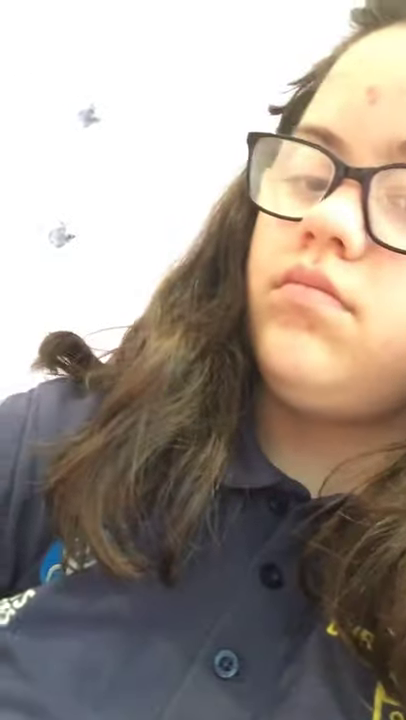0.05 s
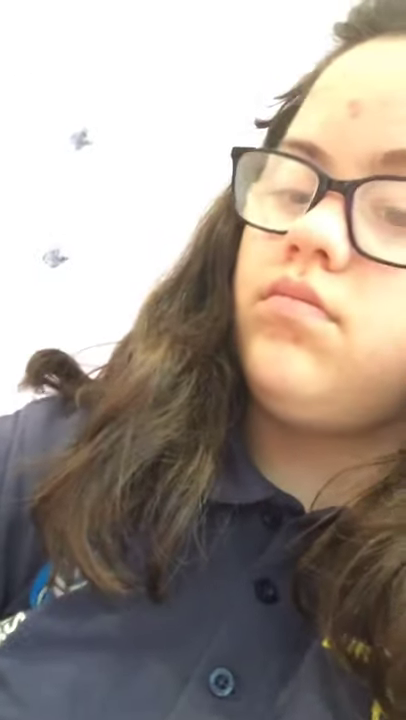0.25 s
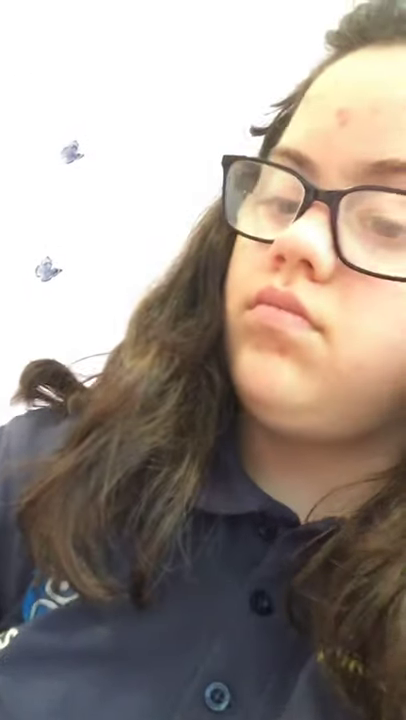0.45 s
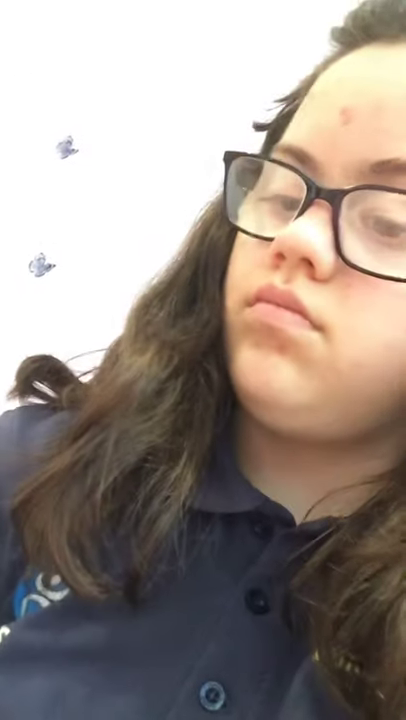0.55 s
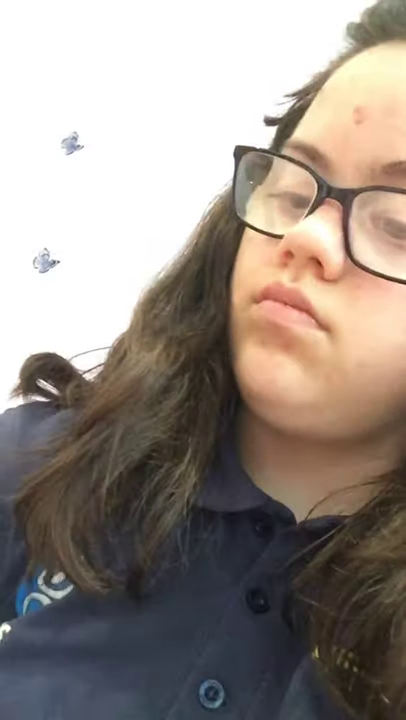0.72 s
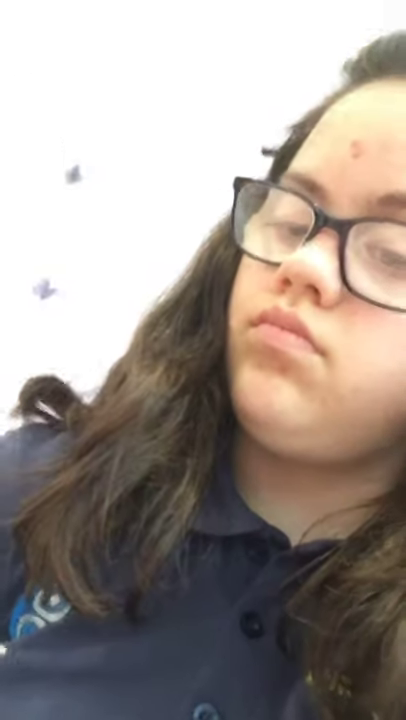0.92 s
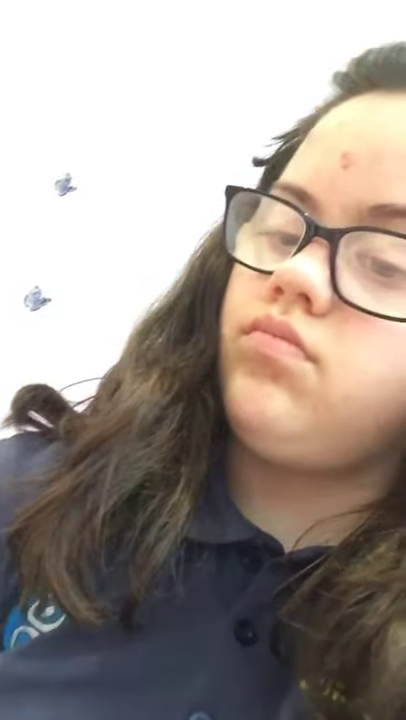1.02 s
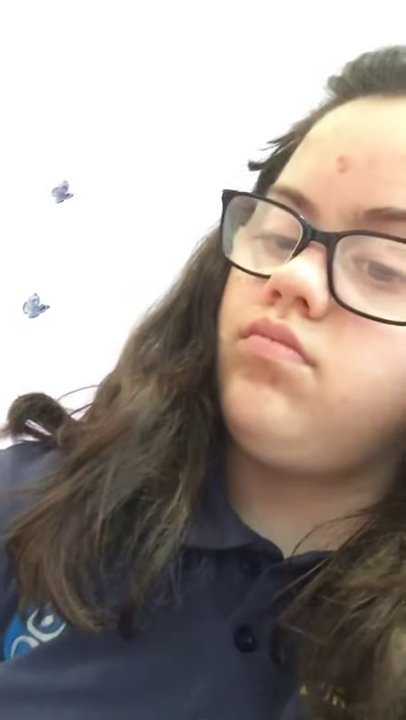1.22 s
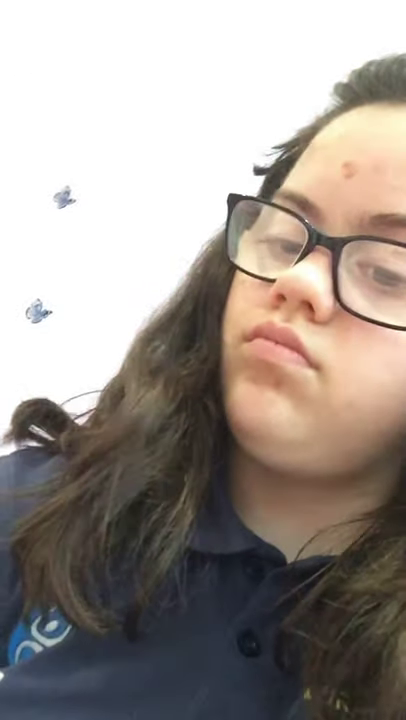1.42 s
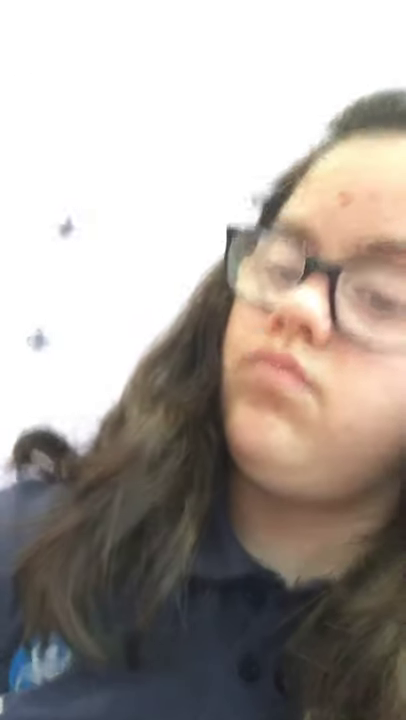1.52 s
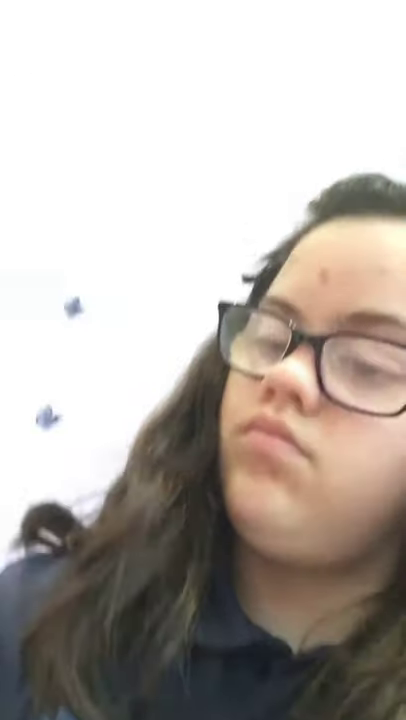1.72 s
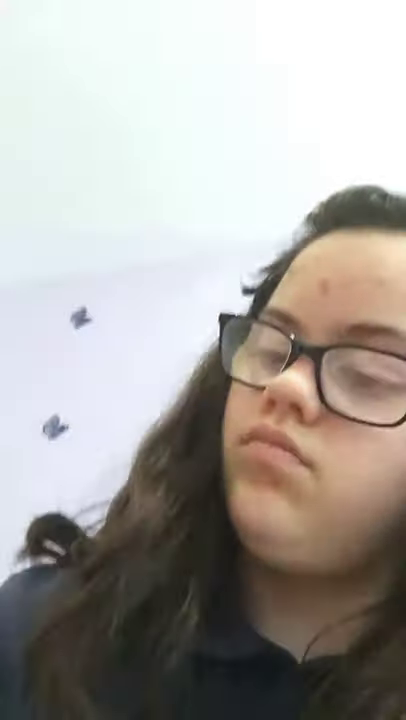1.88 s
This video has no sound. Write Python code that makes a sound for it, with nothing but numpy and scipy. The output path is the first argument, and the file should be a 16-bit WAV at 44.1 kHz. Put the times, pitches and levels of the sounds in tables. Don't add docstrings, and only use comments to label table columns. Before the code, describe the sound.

Plastic pens clatter in a soft case, close to a phone in a small room. Soft rustle and light ticks lead to the loudest sharp crack at 0.22 s, with a fading metallic buzz. Near quiet follows until knocks at 0.83-0.87, a hard cluster at 0.99-1.02 and more to 1.15. Light ticks run 1.27-1.58, a firmer knock lands at 1.68, then it fades over faint, gated low drone.

```python
import sys
import numpy as np
from scipy import signal
from scipy.fft import rfft, irfft
from scipy.io import wavfile
from scipy.ndimage import uniform_filter1d

SR = 44100
rng = np.random.default_rng(int(sys.argv[2]) if len(sys.argv) > 2 else 0)


def transcribe(signal):
    frames = np.atleast_2d(signal).T
    limited = np.clip(frames, -1, 1)
    pcm = np.round(limited * 32767).astype(np.int16)
    wavfile.write(sys.argv[1], SR, pcm)


def volts_from_decibels(level):
    exponent = np.asarray(level, float) / 20
    return 10 ** exponent


N = 85995
T = np.arange(N) / SR

SPLIT_HZ = 7800
CRACK_T60_S = 0.0055
THUMP_HZ, THUMP_T60_S = 344.1, 0.03


def unit(x):
    return x / np.sqrt(np.mean(x ** 2))


def peak_one(x):
    return x / np.abs(x).max()


def band(x, lo_hz, hi_hz):
    return signal.sosfilt(signal.butter(2, [lo_hz, min(hi_hz, 0.49 * SR)], "band", fs=SR, output="sos"), x)


def noise_band(lo_hz, hi_hz):
    return unit(band(rng.standard_normal(N), lo_hz, hi_hz))


def lowpass(x, order, hz):
    return signal.sosfilt(signal.butter(order, hz, fs=SR, output="sos"), x)


def coloured(points):
    hz, db = np.array(points).T
    f = np.arange(N // 2 + 1) * SR / N + 1
    curve_db = np.interp(np.log(f), np.log(hz), db, left=-80, right=-80)
    return unit(irfft(rfft(rng.standard_normal(N)) * volts_from_decibels(curve_db), N))


def walk(rate):
    k = int(SR / rate)
    steps = np.repeat(rng.standard_normal(N // k + 1), k)
    return unit(uniform_filter1d(uniform_filter1d(steps, k), k)[:N])


def ring(t, hz, t60):
    return np.sin(2 * np.pi * hz * t) * 1000. ** (-t / t60)


def add(out, s, x):
    i = int(s * SR)
    out[i:i + len(x)] += x[:max(N - i, 0)]


# f/Hz, width/Hz, level/dB
DRONE_BANDS = [(172.8, 12.2, -2), (225.7, 36, -3), (302.3, 20, -4), (123, 58, -12), (216, 130, -3.5)]
# f/Hz, level/dB per Hz
AIR_COLOUR = [(190, -36.5), (330, -2.5), (372, -5.5), (730, 0), (912, -4), (1020, 2.5), (1150, -8),
              (2110, -37), (2200, -42.5), (2860, -69), (4840, -120)]
# t/s, drone level/dB, favoured f/Hz, air level/dB
GATE_OPENING = [(0.0, -46, 260, -64.5), (.09, -50, 220, -64.5), (0.16, -58, 240, -64.5),
                (.32, -60, 190, -67), (0.504, -60.5, 170, -69.5), (0.7, -59.5, 170, -74),
                (0.764, -63.5, 220, -67.5), (0.912, -57.5, 240, -64.5), (1.0, -51, 215, -68.5),
                (1.14, -60, 170, -69), (1.222, -67, 200, -69.5), (1.42, -66, 230, -71),
                (1.558, -62, 300, -73), (1.682, -57, 230, -66.5), (1.84, -62, 185, -77.5),
                (1.95, -75.5, 230, -98)]


def background():
    s, drone_db, favoured_hz, air_db = np.array(GATE_OPENING).T
    favoured = np.interp(T, s, favoured_hz)
    drone = np.zeros(N)
    for hz, width, db in DRONE_BANDS:
        off_pitch_db = 20 * np.abs(np.log2(hz / favoured))
        drone += volts_from_decibels(db + 2.0 * walk(7.6) - off_pitch_db) * noise_band(hz - width / 2, hz + width / 2)
    drone = unit(drone) * volts_from_decibels(np.interp(T, s, drone_db))
    air = coloured(AIR_COLOUR) * volts_from_decibels(0.99 * walk(28)) * volts_from_decibels(np.interp(T, s, air_db))
    hiss = volts_from_decibels(-93.5) * rng.standard_normal(N)
    return drone + air + hiss


# f/Hz, level/dB per Hz
CLOTH_COLOUR = [(130, 3), (1700, 8.5), (2300, -0.5), (3100, 4), (5000, 0.5), (6600, 3), (10000, -3.5),
                (14800, -6), (17000, -5)]
# start t/s, length t/s, level/dB, low edge f/Hz, high edge f/Hz
CLOTH_SLIDES = [(0, .12, -61.5, 1200, 5700), (0.011, 0.09, -61, 7400, 14800),
                (0.15, .075, -57, 2300, 10000), (.11, .11, -70, 1200, 16000),
                (0.135, 0.09, -68, 2600, 4200), (0.37, 0.1, -60, 4000, 16500),
                (.4, 0.047, -76.5, 2770, 3130), (0.49, 0.045, -74, 2100, 6500),
                (0.48, 0.03, -70, 9500, 16050), (.505, .03, -66, 7800, 16050),
                (0.566, 0.092, -75.5, 11700, 16740), (0.601, 0.13, -91, 5600, 8910),
                (0.73, 0.085, -77.5, 4800, 16240), (.72, .075, -87, 2800, 3400),
                (.833, 0.037, -48, 2940, 6100), (0.795, 0.17, -56.5, 2400, 16340),
                (0.855, 0.032, -51, 250, 950), (.985, .045, -49, 140, 800), (1.675, .04, -56, 160, 1500),
                (1.265, .04, -68, 1000, 1750), (1.27, .03, -70, 13000, 16000), (.82, .04, -54, 600, 1700),
                (0.959, 0.044, -62.5, 1180, 15800), (1.01, .22, -59, 1000, 4200),
                (1.24, 0.1, -63.5, 2900, 6000), (1.27, 0.03, -74, 7000, 11000),
                (1.365, 0.03, -66, 1500, 4000), (1.375, .06, -65, 3800, 7400),
                (1.455, 0.055, -61, 3000, 6500), (1.458, .055, -68, 7000, 12500),
                (1.503, 0.078, -67, 1510, 4740), (1.55, 0.044, -71.5, 7200, 15100),
                (1.638, 0.08, -59, 2200, 4200), (1.63, 0.075, -61, 5000, 7800),
                (1.665, .06, -62, 8000, 16000), (1.64, .03, -80, 10500, 13500),
                (1.635, .04, -68, 1200, 1800), (1.55, .055, -63, 1700, 3200), (.27, .12, -65, 4500, 16000),
                (1.865, 0.068, -74, 900, 1163)]


def rustle():
    grain_db, streak_db = 2, 4
    out = np.zeros(N)
    noise = coloured(CLOTH_COLOUR) * volts_from_decibels(grain_db * walk(500))
    for s, length, db, lo_hz, hi_hz in CLOTH_SLIDES:
        a, b = int(max(s, 0) * SR), int((s + length) * SR)
        swell = np.sin(np.pi * np.linspace(0, 1, b - a) ** 0.85) ** 2
        spectrum = rfft(band(band(noise[a:b], lo_hz, hi_hz), lo_hz, 0.92 * hi_hz))
        streaks = np.interp(np.linspace(0, 59, len(spectrum)), np.arange(60), rng.standard_normal(60))
        slide = unit(irfft(spectrum * volts_from_decibels(streak_db * streaks), b - a))
        out[a:b] += volts_from_decibels(db) * swell ** 0.7 * slide
    return out


def tick(hz, treble_db, cap_hz):
    note_t60_s, cap_db, crack_db, thump_db = 0.006, -4, -3, -22
    t = np.arange(SR // 8) / SR
    low, high = min(hz, cap_hz), max(hz, cap_hz)
    crack = rng.standard_normal(len(t)) * 1000. ** (-t / CRACK_T60_S)
    body = ring(t, hz, note_t60_s) + volts_from_decibels(cap_db) * ring(t, cap_hz, note_t60_s)
    body = body + volts_from_decibels(crack_db) * band(crack, 0.75 * low, 1.25 * high)
    body = lowpass(body, 6, 1.25 * high)
    top = band(band(crack, SPLIT_HZ, 11500), SPLIT_HZ, 13500)
    thump = ring(t, THUMP_HZ, THUMP_T60_S) * np.minimum(t / 0.002, 1)
    return peak_one(body) + volts_from_decibels(treble_db) * peak_one(top) + volts_from_decibels(thump_db) * thump


# t/s, peak level/dB, barrel f/Hz, treble level/dB, cap f/Hz
LIGHT_TOUCHES = [(0.0217, -42, 1640, -18.5, 3300), (.160, -48, 3300, -20, 5000),
                 (0.186, -41, 4800, -14, 7500), (0.196, -45, 4000, -4, 8000), (.506, -58, 2500, -3, 5500),
                 (.9128, -35, 3150, -18, 4200), (.9145, -43, 3050, -20, 4400), (.940, -49, 4500, -12, 3100),
                 (1.2734, -46, 3000, -16, 4600), (1.2772, -36, 4600, -18, 3200),
                 (1.2815, -45, 3200, -10, 4700), (1.2865, -44, 3150, -18, 4800),
                 (1.3772, -39, 2040, -45, 1200), (1.378, -50, 6300, -40, 4300),
                 (1.3965, -37, 6200, -46, 4700), (1.405, -52, 6400, -41, 5500),
                 (1.410, -55, 6200, -41, 5000), (1.460, -52, 4000, -20, 5500),
                 (1.4712, -42, 4400, -10, 6000), (1.4778, -40, 4400, -16, 6200),
                 (1.4945, -43, 5000, -6, 1700), (1.4975, -49, 1600, -14, 3500),
                 (1.521, -56, 2000, -24, 6500), (1.525, -54, 1900, -20, 3800),
                 (1.533, -55, 3040, -30, 2000), (1.543, -53, 4400, -28, 5000),
                 (1.5555, -44, 2300, -18, 2800), (1.5718, -39.5, 2100, -11, 2900),
                 (1.580, -54, 2300, -15, 3000), (1.675, -42, 3400, -14, 5400),
                 (1.686, -41, 3070, -11.5, 4800), (1.690, -45, 3500, -10, 7500),
                 (1.705, -47, 3300, -10.5, 5200), (1.764, -55, 1300, -30, 900),
                 (1.797, -72, 5000, -15, 7500)]


def ticks():
    out = np.zeros(N)
    for s, db, hz, treble_db, cap_hz in LIGHT_TOUCHES:
        add(out, s, volts_from_decibels(db) * tick(hz, treble_db, cap_hz))
    return out


# f/barrel f, level/dB
BARREL_OVERTONES = [(.47, -20.5), (1.45, -6), (2.15, -11.5)]


def knock(hz, treble_db):
    barrel_t60_s, barrel_db, contact_cycles, thump_db = 0.006, -7, 0.4, -25
    t = np.arange(SR // 8) / SR
    crack = rng.standard_normal(len(t)) * 1000. ** (-t / CRACK_T60_S)
    body = band(band(crack, 0.42 * hz, 2.2 * hz), 0.36 * hz, 20000)
    body = body + volts_from_decibels(barrel_db) * ring(t, hz, barrel_t60_s)
    for ratio, db in BARREL_OVERTONES:
        detune = 1 + 0.05 * rng.standard_normal()
        body = body + volts_from_decibels(db) * ring(t, hz * ratio * detune, 0.7 * barrel_t60_s)
    body = body * np.minimum(t * hz / contact_cycles, 1)
    body = lowpass(body, 6, min(4.9 * hz, SPLIT_HZ))
    top = band(band(crack, SPLIT_HZ, 15000), SPLIT_HZ, 19000)
    thump = ring(t, THUMP_HZ, THUMP_T60_S)
    thump = thump + ring(t, 2.1 * THUMP_HZ, 0.47 * THUMP_T60_S)
    thump = thump + 1.6 * ring(t, 3.9 * THUMP_HZ, 0.3 * THUMP_T60_S)
    thump = thump * np.minimum(t / 0.0018, 1)
    return peak_one(body) + volts_from_decibels(treble_db) * peak_one(top) + volts_from_decibels(thump_db) * thump


# t/s, peak level/dB, barrel f/Hz, treble level/dB
HARD_HITS = [(0.2164, -8.5, 6900, -3), (0.2178, -18, 6300, -5), (0.2209, -32, 3160, -13),
             (0.227, -33.5, 5380, -8), (0.2265, -27.5, 4480, -8), (.8290, -36, 7040, -7),
             (0.8352, -36, 7400, -1.5), (0.8375, -38, 7800, -4), (.8527, -37.5, 4700, -11),
             (0.8562, -28.5, 4460, 0), (.858, -33, 8500, 2), (0.8695, -29.5, 5640, 4.5),
             (0.9904, -14, 6000, -7.5), (.9918, -21, 3000, -6), (0.9959, -31, 6880, -1.5),
             (1.0004, -30.5, 3000, -3), (1.004, -20.5, 4860, -2), (1.0102, -29, 6865, 0),
             (1.0130, -16.5, 4500, -6.5), (1.0150, -18, 6000, -12), (1.02, -34, 8000, 5),
             (1.1065, -27.5, 3400, -11), (1.1109, -35, 3050, -11.5), (1.1396, -39.5, 2520, -8),
             (1.1431, -25.5, 6770, -5), (1.1536, -36, 3100, -8.5), (1.6813, -20.5, 3300, -4)]


def knocks():
    out = np.zeros(N)
    for s, db, hz, treble_db in HARD_HITS:
        add(out, s, volts_from_decibels(db) * knock(hz, treble_db))
    return out


# f/Hz, level/dB, t60/s, part (1 clip tongue, 2 clip edge, 3 barrel), half width/f
BUZZ_NOTES = [(5324, -2, .36, 1, .018), (7800, -12, .25, 2, .02), (10720, -12, .2, 2, .015),
              (12150, -6, .16, 2, .012), (14850, -6, .2, 2, .015), (3110, -9, .2, 3, .05),
              (4500, -14, .16, 3, .06)]
# t/s, clip tongue level/dB, clip edge level/dB, barrel level/dB
BUZZ_STARTS = [
    (.217, -43, -47, -55.5),
    (.8365, -70, -53, -55),
    (.857, -62.5, -50, -62),
    (.870, -79, -64.5, -70),
    (.913, -77, -79, -49),
    (.991, -56, -52, -37),
    (1.111, -80, -63, -46),
    (1.143, -76, -77, -60.5),
    (1.277, -80, -82, -69),
    (1.683, -82, -76, -62),
]


def metal():
    chatter_db, chatter_per_s = 3, 90
    out = np.zeros(N)
    for hz, db, t60, part, width in BUZZ_NOTES:
        envelope = np.zeros(N)
        for shake in BUZZ_STARTS:
            since = T - shake[0]
            envelope += volts_from_decibels(shake[int(round(part))]) * (since > 0) * 1000. ** (-np.maximum(since, 0) / t60)
        chatter = volts_from_decibels(db + chatter_db * walk(chatter_per_s))
        out += chatter * envelope * noise_band(hz * (1 - width), hz * (1 + width))
    return out


# f/Hz, level/dB, t60/s
ROOM_BANDS = [(756, -30, 0.12), (1400, -23, 0.22), (2250, -35, 0.15), (3400, -29.5, 0.22),
              (5200, -33, 0.25), (7510, -29.5, 0.3), (10500, -27, 0.22), (14900, -22, 0.22)]


def room(x):
    first_echo_s, gate_hold_s, gate_floor_db = 0.0033, 0.23, -80
    t = np.arange(SR // 2) / SR
    out = np.zeros(N)
    for hz, db, t60 in ROOM_BANDS:
        fade = 1e6 ** (-t / t60) * (t > first_echo_s)
        fade = fade * np.exp(-2 * (t / gate_hold_s) ** 4)
        heard = band(band(x, hz / 1.2, hz * 1.23), hz / 1.25, hz * 1.3)
        power = np.abs(signal.fftconvolve(heard ** 2, fade)[:N]) * volts_from_decibels(2 * db) * 460 / hz
        level = power ** 1.5 / (power + volts_from_decibels(2 * gate_floor_db))
        out += level * noise_band(hz / 1.2, hz * 1.23)
    return out


def scene():
    quiet = background() + rustle()
    hits = ticks() + knocks()
    soft = quiet + metal() + room(hits)
    soft = signal.sosfilt(signal.ellip(8, 0.3, 60, 15900, fs=SR, output="sos"), soft)
    return (hits + soft)[None]


def roll_off(x):
    return signal.sosfilt(signal.butter(12, 16990, fs=SR, output="sos"), x)


def record(dry):
    dropout_s, dropout_width_s, dropout_db = 1.614, 0.016, -24
    x = signal.sosfilt(signal.butter(2, 110, "high", fs=SR, output="sos"), dry)
    x = x * volts_from_decibels(dropout_db * np.exp(-((T - dropout_s) / dropout_width_s) ** 2))
    x = signal.sosfilt(signal.ellip(8, 0.3, 70, 16900, fs=SR, output="sos"), x)
    return roll_off(x)


dry = scene()
out = record(dry)
transcribe(out)
```